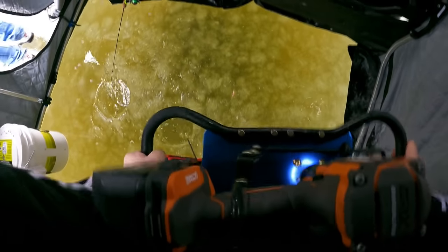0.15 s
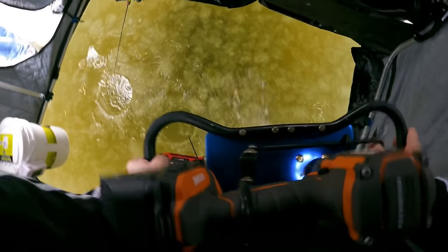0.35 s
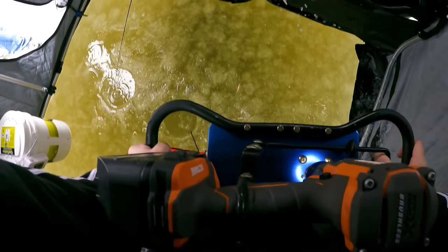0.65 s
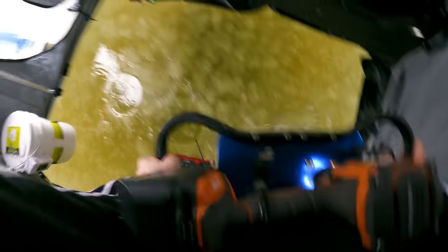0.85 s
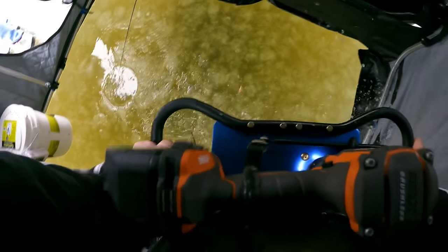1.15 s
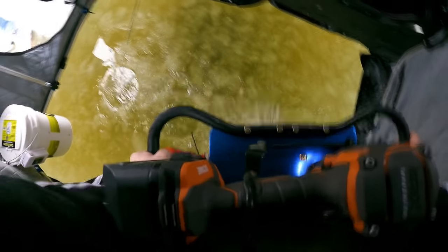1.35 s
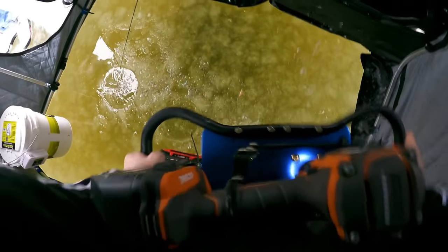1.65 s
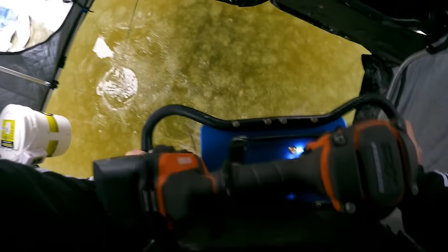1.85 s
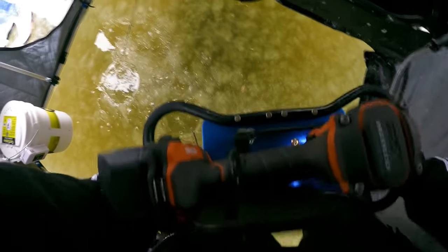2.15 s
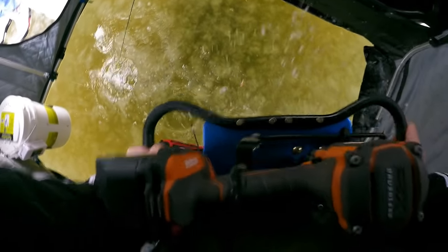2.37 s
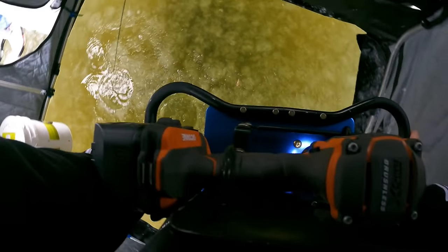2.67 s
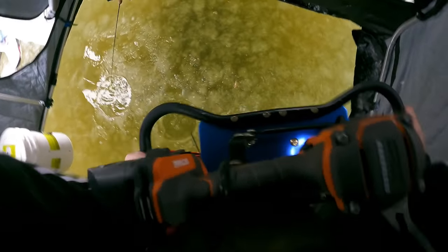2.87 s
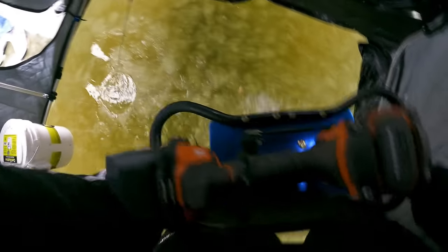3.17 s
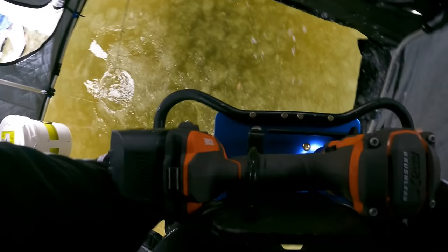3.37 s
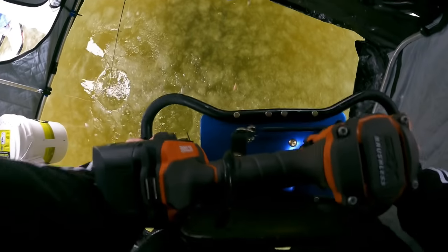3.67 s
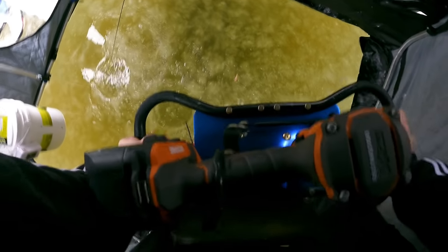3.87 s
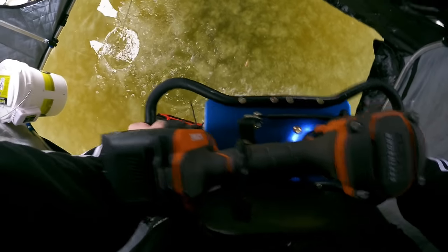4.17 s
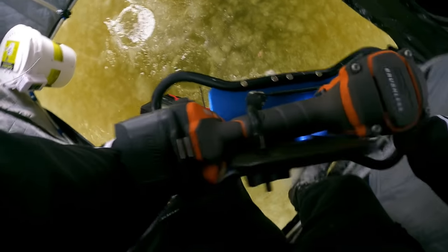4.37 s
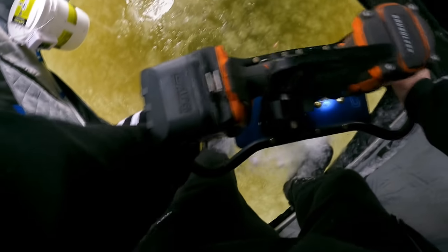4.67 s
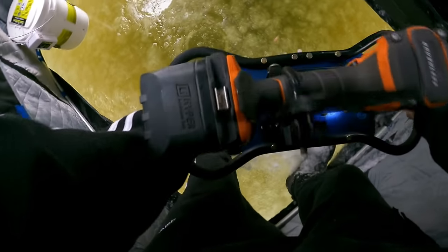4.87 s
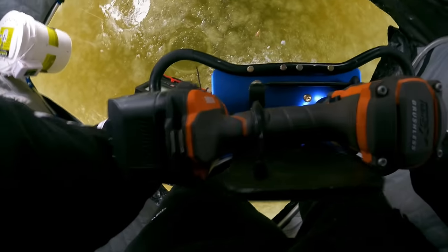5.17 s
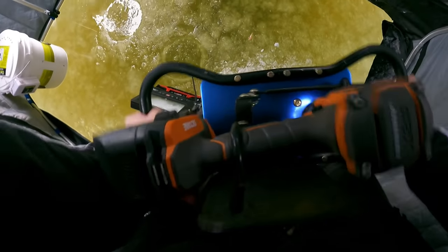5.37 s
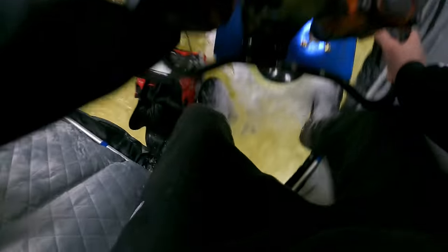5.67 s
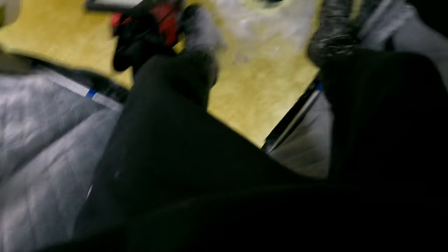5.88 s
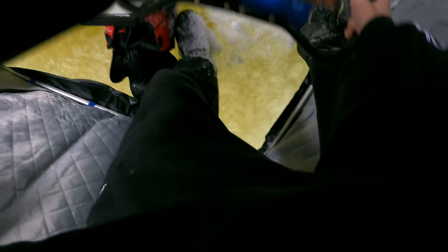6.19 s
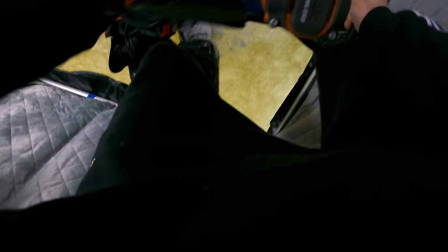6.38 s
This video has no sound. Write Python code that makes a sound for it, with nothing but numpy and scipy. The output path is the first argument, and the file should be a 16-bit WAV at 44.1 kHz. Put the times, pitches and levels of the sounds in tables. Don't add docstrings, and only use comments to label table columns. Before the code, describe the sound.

Close, dry sound inside a cloth shelter with faint still air and low hum. Cloth rustles and a tick at 0.1 s. From 0.25 s a drill motor hums, whines up quickly and auger blades crunch ice with bright chip spray and dull tube ringing until 0.53. Similar quarter-second pulls follow at 0.8, 1.3, 1.75 and 2.1, with quick coast-downs and rustling gaps. A tiny touch and soft knocks come around 2.45, cloth at 2.6, then a longer cut 2.95-3.35. The longest runs 3.65-4.65, gear whine wavering and rising as it breaks through, the hole booming low with a short metallic ring. Cloth shuffles and slush hisses; heavy knocks hit near 5.2. A pull at 5.45-5.7 drums loudly and clatters as the motor sags; a weak one at 5.85 has a sharp swish. Small knocks and cloth fade by 6.5.

```python
import sys
import numpy as np
from scipy import signal
from scipy.fft import rfft, irfft, next_fast_len
from scipy.io import wavfile
from scipy.ndimage import uniform_filter1d

SR = 44100
rng = np.random.default_rng(int(sys.argv[2]) if len(sys.argv) > 2 else 0)


def pcm_store(signal):
    levels = np.round(np.clip(np.atleast_2d(signal), -1, 1) * 32767)
    wavfile.write(sys.argv[1], SR, levels.astype(np.int16).T)


def gain_from_db(level_db):
    decades = np.asarray(level_db, float) / 20
    return 10 ** decades


N = 287973
LIFT_S = 4.77


def evened(x):
    return x / np.sqrt(np.mean(x ** 2) + 1e-20)


def add(mix, s, sound):
    part = mix[round(s * SR):][:len(sound)]
    part += sound[:len(part)]


def coloured(x, points):
    hz, db = np.transpose(points)
    size = next_fast_len(len(x))
    log_hz = np.log(np.fft.rfftfreq(size, 1 / SR) + 1)
    gain = gain_from_db(np.interp(log_hz, np.log(hz), db, -100, -100))
    return evened(irfft(rfft(x, size) * gain, size)[:len(x)])


def resonate(x, hz, width):
    turn = np.exp(2j * np.pi * np.cumsum(hz * np.ones(len(x))) / SR)
    r = np.exp(-np.pi * width / SR)
    return 2 * (turn * signal.lfilter([1 - r], [1, -r], x / turn)).real


def drift(hz, size=N):
    noise = rng.standard_normal(size + 2000)
    return evened(signal.lfilter(*signal.butter(2, hz, fs=SR), noise)[2000:])


def chips(per_s, spread_db, lumps_db, lump_hz):
    size = gain_from_db(spread_db * np.minimum(rng.exponential(1, N), 4)) * rng.standard_normal(N)
    return size * (rng.random(N) < per_s / SR) * gain_from_db(lumps_db * drift(lump_hz))


def streaked(x, depth_db, frames, bins):
    z = signal.stft(x, nperseg=512, noverlap=384)[2]
    patches = rng.standard_normal(z.shape[::-1]).T
    patches = uniform_filter1d(patches, size=bins, axis=0)
    patches = evened(uniform_filter1d(patches, size=frames, axis=1))
    return signal.istft(z * gain_from_db(depth_db * patches), nperseg=512, noverlap=384)[1][:N]


def levels(tables):
    out = np.zeros((len(tables[0][0]) - 1, N))
    t = np.arange(N) / SR
    for rows in tables:
        s, *db = np.transpose(rows)
        inside = (t >= s[0]) & (t < s[-1])
        total_db = [db[0]] + [db[0] + more for more in db[1:]]
        gain = gain_from_db([np.interp(t[inside], s, d) for d in total_db])
        out[:, inside] = np.maximum(out[:, inside], gain)
    return uniform_filter1d(out, size=130, axis=1)


SPRAY_DB = [-4, -5, -1.5, -2.5, 3]
DRUM_DB = [6.5, 1, -1, 1.5, 4.5]


def burst(bite, release, db, sag_db, drum_db):
    rise_s, rise_db, coast_s, coast_db = 0.049, 30, .09, 35
    settled = min(bite + 0.046, (bite + release) / 2)
    s = [bite - rise_s, bite, settled, release, release + coast_s]
    grind_db = [db - rise_db, db, db, db - sag_db, db - sag_db - coast_db]
    return np.transpose([s, grind_db, SPRAY_DB, drum_db + np.array(DRUM_DB)])


# (blades bite [s], release [s], grind [dB], sag while cutting [dB], drumming over grind [dB])
BURSTS = [
    (0.299, 0.533, -18, 1.5, -2.5),
    (0.843, 1.096, -17.5, 3, -1),
    (1.324, 1.582, -18, 1.5, -0.5),
    (1.789, 1.983, -18, 1, -3.5),
    (2.157, 2.356, -19, 0, -0.5),
    (2.456, 2.472, -26, -2, 2),
    (2.956, 3.366, -18.5, 1, -0.5),
    (3.672, 4.664, -19.5, 2, 0.5),
    (5.489, 5.716, -23, 14.5, 11),
    (5.843, 5.979, -34, -3.5, 15.5),
]


def pulls():
    return levels([burst(*row) for row in BURSTS])


# (frequency [Hz], level [dB per Hz])
AIR = [(24, -43), (40, -6), (340, 5), (1340, -14.5), (3800, -22), (7070, -29), (9070, -43), (10000, -33.5),
       (13900, -59), (15300, -73)]


def background():
    air = gain_from_db(-41) * coloured(rng.standard_normal(N) * gain_from_db(1.3 * drift(22)), AIR)
    hum = gain_from_db(-51.5) * evened(resonate(resonate(rng.standard_normal(N), 82.4, 12), 82.4, 12))
    shake = rng.standard_normal(N) * gain_from_db(2.5 * drift(12))
    floor = evened(resonate(resonate(shake, 168, 196), 168, 196))
    rest_db, shake_db, lag_s = -52.5, -13, 0.036
    through_s, through_db = 3.75, -7
    grind = pulls()[0]
    keep = np.exp(-1 / (lag_s * SR))
    work = np.minimum(grind, signal.lfilter([1 - keep], [1, -keep], grind))
    work = work * gain_from_db(through_db * (np.arange(N) > through_s * SR))
    return air + hum + (gain_from_db(rest_db) + gain_from_db(shake_db) * work) * floor


# (frequency [Hz], level [dB per Hz])
RUSTLE = [(590, -10), (1000, -9), (1530, -12), (1710, -6), (7200, -11), (11100, -24), (15300, -45)]
# (frequency [Hz], level [dB per Hz])
LATE_RUSTLE = [(700, -32), (1100, -2), (1600, -1), (2600, -2.5), (3300, -7.5), (4200, -1.5), (7000, -8.5),
               (11000, -30.5), (15300, -58)]
# (frequency [Hz], level [dB per Hz])
SHUFFLE = [(71, -43), (120, -7), (401, -3), (535, -3.5), (660, -7), (838, -17), (908, -9), (1300, -33),
           (1690, -58), (2860, -120)]
# (time [s], rustle [dB])
STIR = [(0, -38), (.2, -43.5), (.7, -43), (1.2, -39.5), (1.7, -42.5), (2.099, -44.5), (2.55, -40),
        (2.74, -39.5), (2.819, -55), (2.92, -61), (3.4, -41.5), (4.72, -40.5), (4.94, -58), (5.05, -48),
        (5.288, -46.5), (5.349, -58.5), (6.098, -51), (6.22, -79)]
# (peak time [s], level
# [dB], 16.5 dB rise [s], 24.5 dB fall [s], shuffle over it [dB])
SWIPES = [(.15, -36, 0.19, 0.037, -4), (1.2, -38.5, 0.078, 0.25, 4.5), (2.62, -35, 0.11, 0.23, 2),
          (4.8, -44.5, 0.095, 0.14, 10), (4.955, -53.5, 0.073, .05, 20.5), (4.995, -37.5, 0.037, .07, 11.5),
          (5.13, -40, 0.044, 0.22, 13.5), (5.206, -28.5, 0.05, .06, 6), (5.73, -42, .1, 0.27, 7),
          (5.845, -22, 0.011, 0.064, -3), (6.13, -45, 0.022, 0.12, 11.5), (6.458, -48, .02, .02, 6),
          (6.515, -42.5, 0.071, 0.081, -8)]


def rustling():
    shuffle_db, follow = -49, 0.74
    stir = [(s, db, shuffle_db - db + follow * (db + 41)) for s, db in STIR + [(N / SR, STIR[-1][1])]]
    swipes = [[(s - 2 * up, db - 33, low), (s, db, low), (s + 2 * down, db - 49, low)]
              for s, db, up, down, low in SWIPES]
    rustle, shuffle = levels([stir] + swipes)
    grains = chips(per_s=9000, spread_db=2.6, lumps_db=2.2, lump_hz=40)
    grains = streaked(grains, depth_db=1.8, frames=6, bins=1)
    whistle = gain_from_db(-7) * evened(resonate(grains, 3300 * (1 + 0.05 * drift(5.3)), width=300))
    lifted = np.arange(N) > LIFT_S * SR
    rubbing = np.where(lifted, coloured(grains, LATE_RUSTLE) + whistle, coloured(grains, RUSTLE))
    soft = chips(per_s=2200, spread_db=1.4, lumps_db=1.9, lump_hz=27)
    return rustle * rubbing + shuffle * coloured(soft, SHUFFLE)


# (time [s], peak [dB], pitch [Hz], t60 [s], ring share [0-1])
TICKS = [(.134, -18, 5250, .09, .35), (.797, -25, 2850, .035, .5), (1.747, -24, 2470, .035, .5),
         (2.4214, -22, 2650, .035, .5), (2.9223, -23, 2350, .03, .3), (3.519, -21, 1750, .05, .2),
         (5.206, -14, 2340, .04, .6), (5.441, -24, 2430, .035, .3), (5.801, -19, 2200, .025, .92),
         (6.114, -34, 2750, .04, .5), (6.2926, -40, 4030, .035, .3), (6.455, -31, 2340, .04, .6)]


def tick(db, hz, t60, share):
    t = np.arange(round(.08 * SR)) / SR
    puff = rng.standard_normal(len(t))
    ringing = evened(resonate(resonate(puff, hz, 700), hz, 700))
    snap = (1 - share) * coloured(puff, RUSTLE) + share * ringing
    snap = snap * gain_from_db(-60 * t / t60) * np.clip(t / .0005, 0, 1) ** 2
    return gain_from_db(db) * snap / np.abs(snap).max()


# (time [s], peak [dB], pitch [Hz], t60 [s])
KNOCKS = [(0.131, -28, 540, 0.062), (2.413, -17.5, 403, 0.077), (2.447, -17, 319, 0.12),
          (2.477, -12, 236, 0.039), (2.586, -17.5, 486, 0.035), (2.617, -15.5, 650, 0.044),
          (2.769, -18, 417, 0.042), (4.984, -9.5, 408, 0.035), (5.185, 2, 233, 0.039),
          (5.198, 0, 494, 0.032), (5.519, -3, 414, 0.049), (5.552, -14, 324, 0.082),
          (5.582, 0.5, 312, 0.039), (5.622, 0.5, 294, 0.087), (5.651, 0.5, 382, 0.077),
          (5.675, -4.5, 267, 0.16), (5.697, -14, 276, 0.13), (5.842, -7, 496, 0.085),
          (5.883, -10, 574, 0.16), (5.976, -6, 332, 0.093), (5.998, -14, 343, 0.065),
          (6.064, -21.5, 562, 0.1), (6.138, -26, 282, 0.1), (6.295, -22, 327, 0.066),
          (6.308, -30, 338, 0.089), (6.453, -30, 280, 0.15)]


def knock(db, hz, t60):
    t = np.arange(round(.2 * SR)) / SR
    fall = gain_from_db(-60 * t / t60) * (1 - np.exp(-t / .002))
    main = np.sin(2 * np.pi * hz * t)
    push = 0.11 * np.sin(2 * np.pi * 0.59 * hz * t)
    partner = 0.22 * gain_from_db(-40 * t / t60) * np.sin(2 * np.pi * 1.58 * hz * t)
    return gain_from_db(db - 0.5) * fall * (main + push + partner)


# (time [s], peak [dB], pitch [Hz], t60 [s])
RINGS = [(1.55, -23, 2480, 0.3), (3.395, -37, 2035, 0.45), (4.6, -17.5, 1218, 0.27),
         (4.67, -13, 1190, 0.066), (5.415, -42, 4200, 0.43), (5.622, -17.5, 996, 0.17)]


def ring(db, hz, t60):
    t = np.arange(round(.13 * SR)) / SR
    return gain_from_db(db - 60 * t / t60) * np.sin(2 * np.pi * hz * t) * signal.windows.tukey(len(t), .2)


# (time [s], peak [dB])
WHIRS = [(0.2558, -30), (0.798, -31), (1.2853, -27), (1.7457, -31), (2.1184, -28), (2.9219, -22.5),
         (3.6318, -27.5), (5.443, -25.5)]


def whir(db):
    t = np.arange(round(0.046 * SR)) / SR
    fuzz = rng.standard_normal(len(t))
    hum = sum(resonate(resonate(fuzz, hz, 380), hz, 380) for hz in (2450, 3150))
    return gain_from_db(db - 3.0 + 150 * t) * evened(hum) * signal.windows.tukey(len(t), .1)


# (time [s], top mesh pitch [Hz], level [dB])
SPINS = [(.288, 6800, -29), (.832, 7310, -30), (1.312, 6820, -32.5), (1.781, 7010, -30.5),
         (2.156, 7170, -29.5), (2.946, 7100, -28.5), (3.658, 6880, -32.5), (5.48, 7320, -28)]
# (time after start [s], share of top speed, level [dB], load [0-1])
SPIN_SHAPE = [(0, .63, -1, 1.05), (.018, .91, -2.5, 1.05), (.028, 1.01, 5.5, 0.07), (.048, .99, -6, .05),
              (.08, .95, -19, .3)]


def spin(s, top_hz, db):
    return np.array(SPIN_SHAPE) * [1, top_hz, 1, 1] + [s, 0, db, 0]


# (time [s], fastest mesh [Hz], level [dB], load [0-1])
RUNS = [
    [(3.7, 6540, -38, 1), (3.785, 6600, -27.5, 0.58), (3.89, 6480, -31.5, 0.82), (4.015, 6090, -30, 0.88),
     (4.19, 6640, -27.5, 0.05), (4.27, 7060, -25.5, 0), (4.35, 6920, -25.5, 0.1), (4.5, 6480, -29, .2),
     (4.66, 6600, -39, 0)],
    [(5.538, 7220, -36, .05), (5.548, 7440, -28, 0), (5.58, 5880, -29, 0.34), (5.604, 5400, -39, 1.1),
     (5.618, 6150, -39, 1), (5.645, 4700, -39.5, 1.2), (5.656, 5500, -50, 1)],
]
MESH_RATIOS = [1, .535, .343, .69]
# (running free [dB], full load [dB])
MIDDLE_DB = (-6, 10)
SLOW_DB = (2.5, -7.5)
SIDE_DB = (-8, -7)


def gears(rows):
    s, hz, fast_db, load = np.transpose(rows)
    mesh_db = [fast_db]
    for free, full in (MIDDLE_DB, SLOW_DB, SIDE_DB):
        mesh_db.append(fast_db + free + (full - free) * load)
    t = np.arange(s[0], s[-1], 1 / SR)
    shaking = np.clip((t - s[0]) / .05, .1, 1) ** 2
    speed = np.interp(t, s, hz) * (1 + .012 * shaking * drift(50, len(t)))
    out = np.zeros(len(t))
    for ratio, level_db in zip(MESH_RATIOS, mesh_db):
        pitch = ratio * speed * (1 + .009 * drift(300, len(t)))
        flutter_db = shaking * np.minimum(6 * drift(45, len(t)), 3)
        gain = 2 ** .5 * gain_from_db(np.interp(t, s, level_db + 1.0) + flutter_db)
        out += gain * np.sin(2 * np.pi * np.cumsum(pitch) / SR)
    return s[0], out * signal.windows.tukey(len(t), min(.008 / (s[-1] - s[0]), 1))


# (time [s], pitch [Hz], level [dB])
HOLE = [
    [(4.3, 447, -30), (4.336, 460, -51), (4.41, 318, -21), (4.574, 314, -13.5), (4.676, 310, -17.5),
     (4.75, 358, -43)],
    [(5.45, 333, -35), (5.51, 392, -15.5), (5.664, 326, -6.5), (5.724, 287, -10.5), (5.78, 304, -29)],
    [(5.82, 456, -28), (5.874, 507, -17), (5.992, 320, -40), (6.03, 345, -31)],
]


def hole(shocks):
    out = np.zeros(N)
    for rows in HOLE:
        s, hz, db = np.transpose(rows)
        t = np.arange(s[0], s[-1], 1 / SR)
        hz = np.interp(t, s, hz)
        boom = evened(resonate(resonate(shocks[:len(t)], hz, 130), hz, 110))
        add(out, s[0], gain_from_db(np.interp(t, s, db) - 4.5) * boom * signal.windows.tukey(len(t), .1))
    return out


# (pitch [Hz], width [Hz], level [dB])
TUBE = [(317.6, 29, 2.5), (358.8, 72, 12.5), (463.6, 31, 9), (599, 49, -1.5), (824, 39, 5), (930, 45, 1),
        (1185, 13, -15)]
# (frequency [Hz], level [dB per Hz])
DRUM = [(18, -67), (30, -69), (152, -12), (241, -12.5), (340, -8), (600, -3.5), (737, -12.5), (836, -17),
        (1300, -25), (1690, -26), (2860, -120)]
# (frequency [Hz], level [dB per Hz])
LATE_DRUM = [(35, -61), (60, -40), (242, -3), (291, -3.5), (371, -3.5), (602, -11.5), (655, -2.5),
             (766, -21), (1800, -22), (2340, -58), (3960, -120)]


def drumming(shocks):
    ringing = np.zeros(N)
    for hz, width, db in TUBE:
        mode = evened(resonate(resonate(shocks, hz, 1.6 * width), hz, 1.6 * width))
        ringing += gain_from_db(db + 4.0 * drift(11)) * mode
    in_ice = 0.79 * evened(ringing) + 0.72 * coloured(shocks, DRUM)
    in_slush = 0.72 * coloured(shocks, LATE_DRUM)
    return evened(np.where(np.arange(N) > LIFT_S * SR, in_slush, in_ice))


# (frequency [Hz], level [dB per Hz])
GRIND = [(590, -5), (1000, -5.5), (1310, -7), (2370, 2.5), (2690, -0.5), (3390, 1.5), (4000, -2),
         (4600, -8.5), (5980, -24), (10100, -120)]
# (frequency [Hz], level [dB per Hz])
SPRAY = [(2470, -78), (4200, -1.5), (4990, -0.5), (6950, -0.5), (9000, -13), (9870, -10), (11100, -18.5),
         (12100, -28.5), (13700, -31), (15300, -73)]


def cutting():
    grind, spray, drum = pulls()
    fractures = chips(per_s=20000, spread_db=2.2, lumps_db=.7, lump_hz=90)
    fractures = streaked(fractures, depth_db=2.4, frames=8, bins=1)
    shocks = chips(per_s=1500, spread_db=1.5, lumps_db=-0.5, lump_hz=36.3)
    blades = grind * coloured(fractures, GRIND) + spray * coloured(fractures, SPRAY)
    return blades + drum * drumming(shocks) + hole(shocks)


def scene():
    mix = background() + rustling() + cutting()
    for rows in [spin(*row) for row in SPINS] + RUNS:
        add(mix, *gears(rows))
    for table, source in ((KNOCKS, knock), (TICKS, tick), (WHIRS, whir), (RINGS, ring)):
        for s, *blow in table:
            add(mix, s, source(*blow))
    return np.array([mix, mix])


def top_cut(x):
    return signal.sosfilt(signal.butter(12, 15630, fs=SR, output="sos"), x)


def record(dry):
    mono = signal.lfilter(*signal.butter(2, 55, "high", fs=SR), dry[0])
    mono = .95 * np.tanh(mono / .95)
    mono = mono - resonate(mono, 9020, width=280)
    top = signal.oaconvolve(mono, signal.firwin(401, 11800, pass_zero=False, fs=SR), "same")
    apart = (1.13 * top + gain_from_db(-43.5) * mono + gain_from_db(-32.0) * np.gradient(mono)) * drift(160)
    edge = signal.firwin(301, 15200, fs=SR)[None]
    stereo = np.array([mono + apart, mono - apart])
    return top_cut(signal.oaconvolve(stereo, edge, "same"))


dry = scene()
out = record(dry)
pcm_store(out)
```